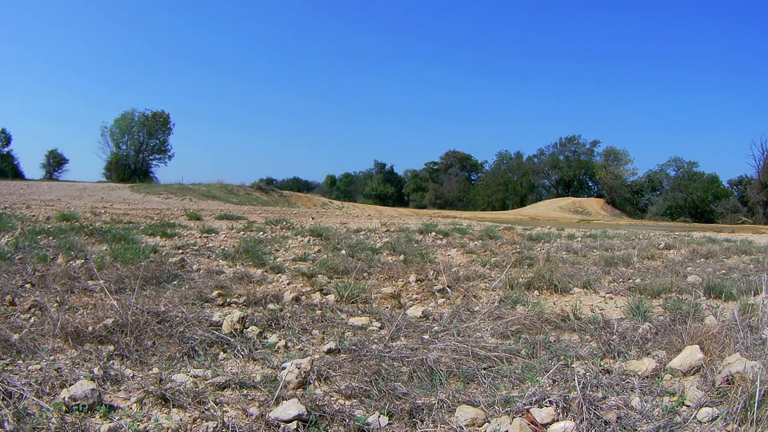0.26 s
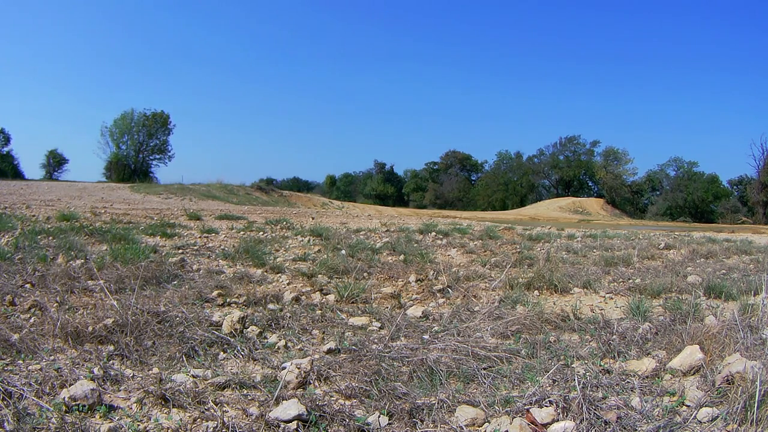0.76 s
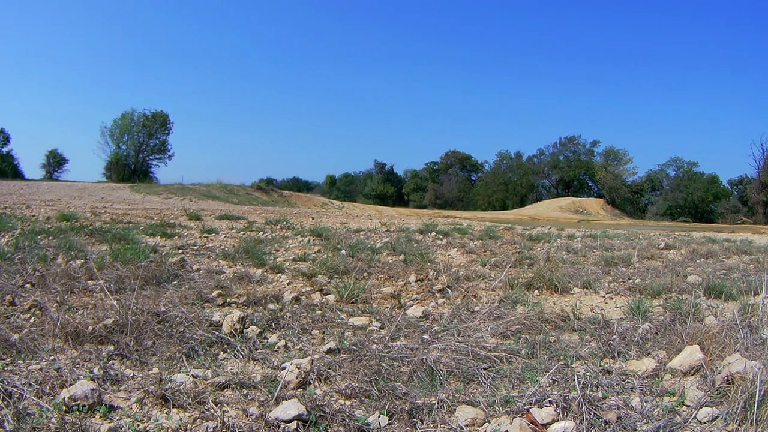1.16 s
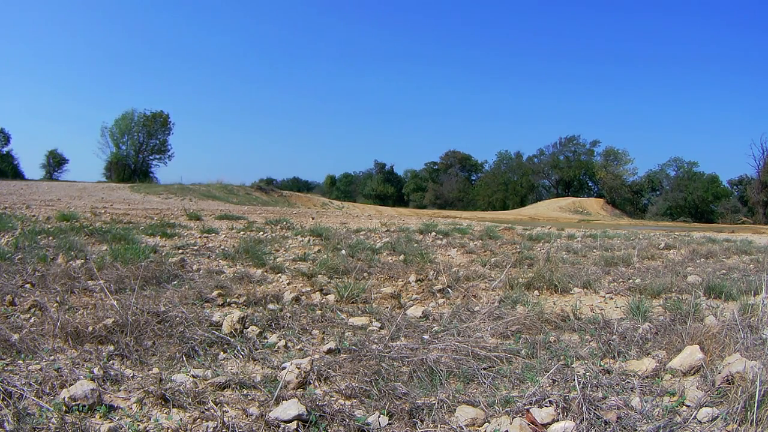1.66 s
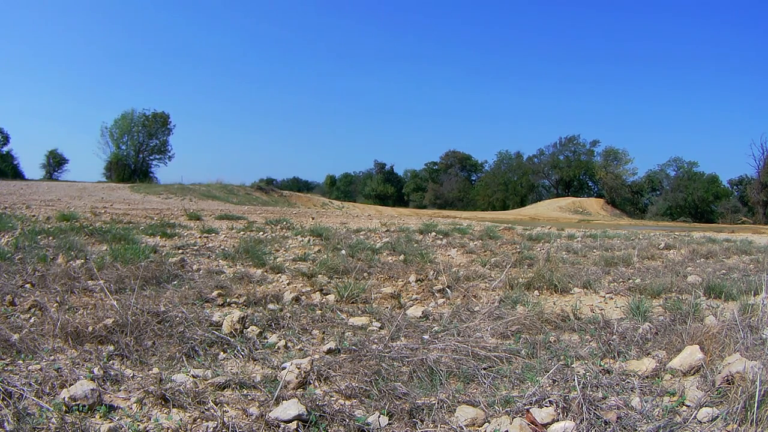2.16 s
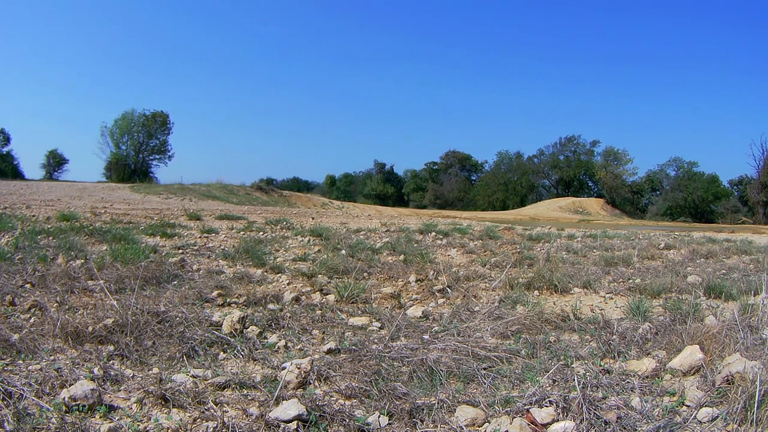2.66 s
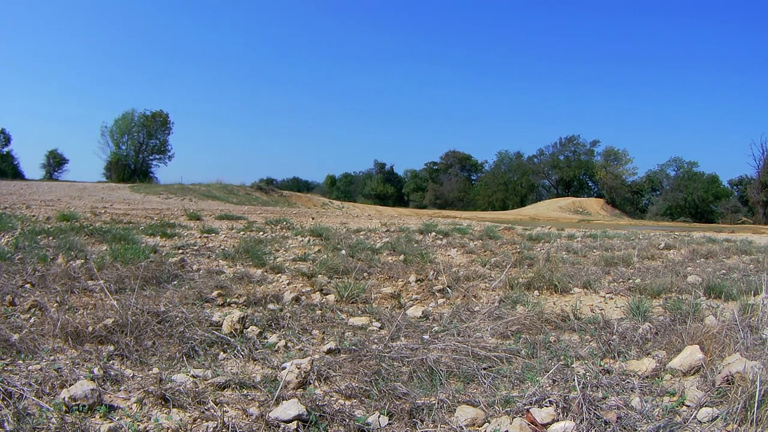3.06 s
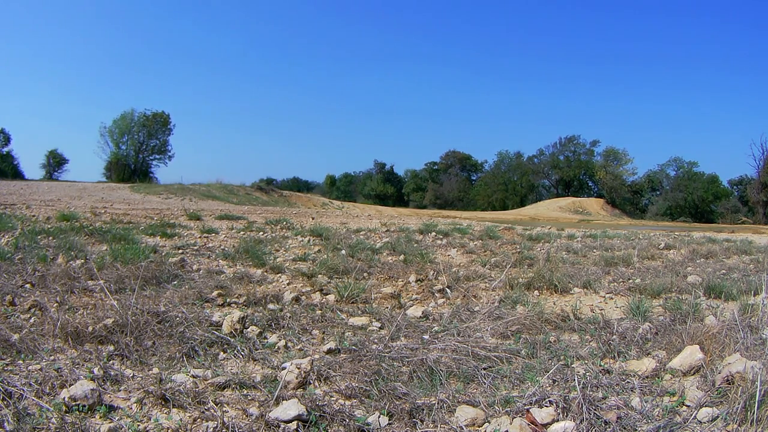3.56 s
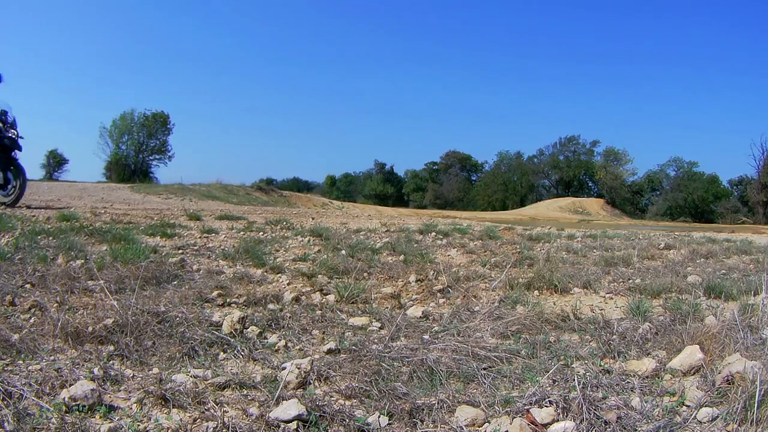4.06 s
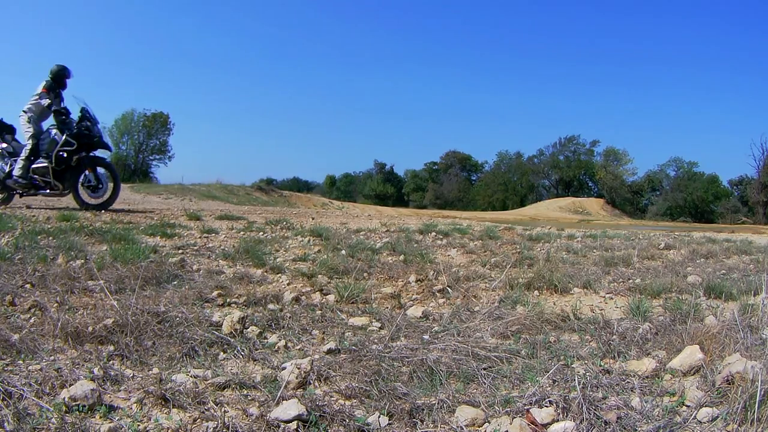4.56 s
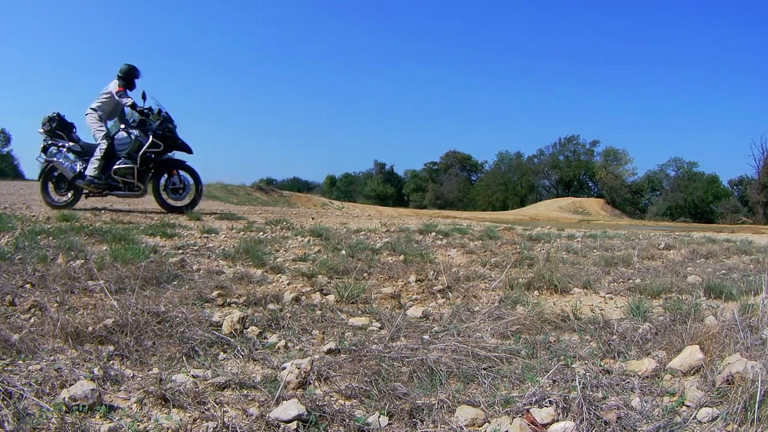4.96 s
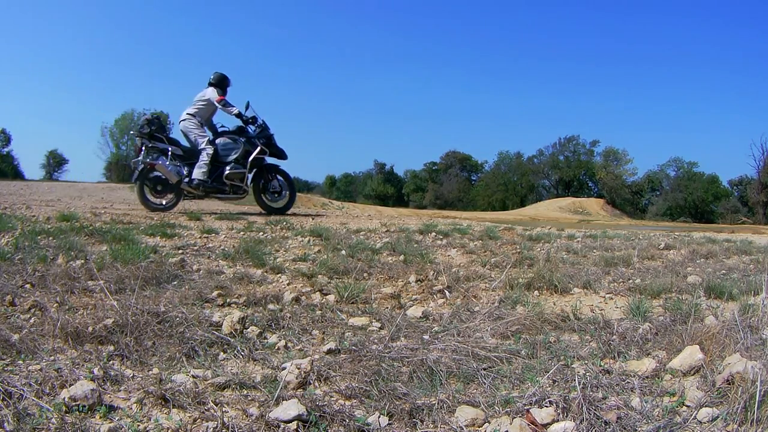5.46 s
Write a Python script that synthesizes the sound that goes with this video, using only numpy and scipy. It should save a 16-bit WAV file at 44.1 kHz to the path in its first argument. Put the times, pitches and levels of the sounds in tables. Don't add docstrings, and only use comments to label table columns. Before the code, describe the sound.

A twin-cylinder motorcycle approaches at low engine speed across an open stony field. Uneven exhaust throbs, pulsing hiss and metallic ticks start fairly distant and grow strongly until about four seconds, then stay close. Tyres crunch dry soil, and stones knock hollowly on the engine guard or ping away. Low air puffs thump the small camera microphone, mostly from three seconds on. The sound is dry, slightly thin and watery in the treble.

```python
import sys
import numpy as np
from scipy import signal
from scipy.io import wavfile
from scipy.ndimage import uniform_filter1d

SR = 44100
rng = np.random.default_rng(int(sys.argv[2]) if len(sys.argv) > 2 else 0)


def file_out(sig):
    cols = np.atleast_2d(sig).T
    lim = np.clip(cols, -1, 1)
    pcm = np.round(lim * 32767).astype(np.int16)
    wavfile.write(sys.argv[1], SR, pcm)


def field_ratio(decibels):
    return 10 ** (np.asarray(decibels, dtype=float) / 20)


N = 251370
TIME = np.arange(N) / SR
TURN_S = 4.73

# time in seconds, nearness of the machine in dB, throttle in dB.
APPROACH = [(0.0, -17.5, 0), (.3, -13, 1.5), (.55, -14.5, 1), (.87, -14, 2), (1.0, -11, 0.5),
            (1.23, -12, 1), (1.65, -11, 2), (2.05, -16.5, 5), (2.17, -14, 3.5), (2.62, -11, 3.5),
            (2.9, -9.5, 3), (3.3, -6.5, 2.5), (3.75, -1.5, 0), (3.95, -1.5, 0), (4.17, 1, 1),
            (4.75, 0.5, 4), (5.33, 1.5, 4), (5.7, 0.5, 2)]


def evened(x):
    return x / np.sqrt(np.mean(x ** 2) + 1e-20)


def column(rows, count):
    rows = np.array(rows)
    return np.interp(TIME, rows[:, 0], rows[:, count])


def bell(t, centre, width):
    return np.exp(-((t - centre) / width) ** 2)


def bumps(events):
    t = np.arange(0, N + 64, 64) / SR
    total = sum(height * np.exp(-2 * ((t - s) / length) ** 2) for s, height, length in events)
    return np.interp(TIME, t, total)


def wander(size):
    once = uniform_filter1d(rng.standard_normal(N), size=size)
    return evened(uniform_filter1d(once, size=size))


def blurred(x, bins, frames):
    return uniform_filter1d(uniform_filter1d(x, size=bins, axis=-2), size=frames, axis=-1)


def turned(t, spread_s):
    return .5 + .5 * np.tanh((t - TURN_S) / spread_s)


def zero_phase(x, order, hz, kind):
    return signal.sosfiltfilt(signal.butter(order, hz, kind, fs=SR, output="sos"), x)


def lifted(x, kind, hz, lift_db):
    return x + (field_ratio(lift_db) - 1) * zero_phase(x, 2, hz, kind)


def noise(points, size, patchy_db, flicker_db, later=((0, 0), (1, 0))):
    hz = np.fft.rfftfreq(size, 1 / SR)
    real, imaginary, patches = rng.standard_normal((4 * N // size + 5, len(hz), 3)).T
    flicker = evened(uniform_filter1d(patches[0], size=5))
    patches = evened(blurred(patches, 9, 12))
    f, db = np.transpose(points)
    shape = np.interp(np.log(hz + 1), np.log(f + 1), db, left=-90, right=-90)[:, None]
    frame_s = np.arange(real.shape[1]) * size / 4 / SR
    change_db = np.interp(hz, *np.transpose(later))[:, None]
    shape = shape + turned(frame_s, spread_s=.3) * change_db
    z = (real + 1j * imaginary) * field_ratio(shape + patchy_db * patches + flicker_db * flicker)
    return evened(signal.istft(z, nperseg=size, noverlap=3 * size // 4)[1][:N])


def ringing(modes, size):
    t = np.arange(size) / SR
    return sum(field_ratio(db - 60 * t / t60) * np.sin(2 * np.pi * hz * t) for hz, db, t60 in modes)


# time in seconds, engine cycles per second.
SPEED = [(0.0, 22.92), (0.21, 22.04), (0.33, 22.96), (0.5, 21.82), (1.16, 22.62), (1.28, 20.85),
         (1.42, 21.73), (2.79, 21.31), (2.95, 20.41), (3.06, 22.09), (3.46, 20.54), (3.88, 21.38),
         (4.15, 21.02), (4.32, 22.75), (4.77, 21.08), (4.88, 23.84), (5.34, 24.1), (5.7, 22.96)]


def crank():
    start_cycle = -.515
    return start_cycle + np.cumsum(column(SPEED, count=1)) / SR


def firings(cycles, place, spread_db, jitter_s):
    at = np.flatnonzero(np.diff(np.floor(cycles - place)) > 0)
    chance = rng.standard_normal((200, 2))[:len(at)]
    late = np.round(jitter_s * SR * chance[:, 0]).astype(int)
    train = np.zeros(N)
    train[np.clip(at + late, 0, N - 1)] = field_ratio(spread_db * chance[:, 1])
    return train


# time in seconds, level change in dB.
UNEVEN = [(.073, -5), (.474, -4), (.566, -5), (.974, 1), (1.193, -4), (1.263, 1), (1.359, -12), (1.752, -3),
          (2.073, -3.5), (2.145, -10), (2.636, 2), (2.894, -5), (3.779, -8), (4.375, -4), (4.464, 2),
          (4.602, -2.5), (4.764, -10), (5.108, -3), (5.235, -2), (5.46, 3), (5.548, -5)]


def exhaust(cycles):
    t = np.arange(2600) / SR
    turns = 95 * t + .42 * (1 - np.exp(-t / .0018))
    boom = -np.sin(2 * np.pi * turns) * (t / .0042 * np.exp(1 - t / .0042)) ** 1.05
    boom += .1 * bell(t, .017, .005) + .17 * bell(t, .022, .0022) - .14 * bell(t, .005, .0055)
    swell = .12 * bell(t, .011, .006) + .26 * bell(t, .029, .012) + .16 * bell(t, .0262, .0025)
    dip = swell - bell(t, .02, .0021)
    chamber = 0.056 * np.sin(2 * np.pi * 395 * t) * np.exp(-t / 0.02)

    near_clicks = firings(cycles, .015, spread_db=.8, jitter_s=.0002)
    far_clicks = firings(cycles, .673, spread_db=1.0, jitter_s=.0003)
    beats = signal.oaconvolve(near_clicks, boom + chamber)
    far = signal.oaconvolve(far_clicks, dip + np.roll(chamber, 800))
    beats += field_ratio(-1.4) * np.roll(far, -round(.02 * SR))
    beats = zero_phase(beats, 2, 28, "high")[:N]

    level_db = -40.5 + 0.6 * column(APPROACH, count=1) + column(APPROACH, count=2)
    uneven_db = bumps([(s, db, .018) for s, db in UNEVEN])
    return field_ratio(level_db + uneven_db) * evened(beats)


# place in the engine cycle 0-1, length in cycles, hiss in dB, crunch in dB.
VALVES = [
    (.16, 0.21, 2, 0),
    (.56, 0.2, 2, 2.5),
    (.83, 0.042, 2, 2.5),
]


def valve_gate(cycles, count):
    luck = 1 + .45 * rng.standard_normal((200, 3))
    gate_db = np.zeros(N)
    for k, row in enumerate(VALVES):
        since = cycles + 2 - row[0]
        u = since % 1 / row[1]
        gate_db += row[count] * luck[since.astype(int), k] * 4 * u * np.exp(1 - 4 * u) ** 1.15
    return evened(field_ratio(gate_db))


# time in seconds, length in seconds, rattle in dB, tappet in dB.
RUTS = [(0.287, 0.037, -0.5, 7), (0.407, 0.072, 3.5, 4.5), (0.548, 0.23, -1.5, 3),
        (1.654, 0.063, 2.5, -0.5), (1.905, 0.11, 4.5, 1), (2.027, 0.057, 6, -7), (2.275, 0.048, 2, -9),
        (2.72, 0.11, 4.5, -8), (3.0, .06, 1.5, -2), (3.417, 0.082, 2.5, 1.5), (3.857, 0.026, 1.5, 10),
        (3.939, 0.028, 3.5, 7), (4.073, 0.017, -2, -9), (4.134, 0.018, 2, 7), (4.333, 0.089, -0.5, 1.5),
        (5.036, 0.1, 1, 6), (5.234, 0.014, -1.5, -2), (5.67, 0.017, -1, 2)]


def shaking(count):
    return bumps([(row[0], row[count], row[1]) for row in RUTS])


# frequency in Hz, density in dB per Hz.
HISS = [(1500, -27), (2300, -11), (3050, -23.5), (3700, -10), (4400, -4.5), (5060, -9), (6200, -5),
        (6800, -2), (7750, 0), (8300, -11), (9000, -2), (10000, 4), (14300, -10), (15300, -4), (15800, -17)]
# frequency in Hz, change in dB.
AWAY = [(2300, -4.5), (3050, 1.5), (4400, -1), (5060, 0.5), (6800, -0.5), (7950, -6.5), (8400, 3),
        (9500, -1)]
# peak in seconds, lift in dB, length in seconds.
AIRY = [
    (.5, 0, .3),
    (1.8, 2, .2),
    (4.0, 2.5, .35),
    (5.4, 4.5, 0.18),
]


def hiss(cycles):
    level_db = -46 + column(APPROACH, count=1) + shaking(count=2)
    top_db = -2.5 - 2 * turned(TIME, spread_s=0.066) + bumps(AIRY)
    top_db = top_db + 2.5 * wander(round(0.18 * SR))
    wide = field_ratio(level_db + 0.5) * noise(HISS, size=256, patchy_db=1.5, flicker_db=0.97, later=AWAY)
    wide = lifted(wide, "low", 7900, 0.15 * (level_db + 51.0))
    return valve_gate(cycles, count=2) * lifted(wide, "high", 11200, top_db)


# frequency in Hz, level in dB, t60 in seconds.
HEAD = [(6900, 7.5, 0.0092), (7120, 2.5, 0.031), (7270, 1.5, 0.043), (7550, 1.5, 0.03), (7820, -4, 0.03),
        (9600, 0, 0.016), (9860, 2, 0.032)]
# place in two engine cycles 0-1, level in dB.
TICKS = [
    (.09, -0.5),
    (.2, -0.5),
    (.3, 1.5),
    (.43, -2),
    (.59, 0),
    (.68, -17),
    (.8, -2),
    (.925, 1),
]


def tappets(cycles):
    ticks = np.zeros(N)
    for mode in HEAD:
        train = np.zeros(N)
        for place, db in TICKS:
            train += field_ratio(db) * firings(cycles / 2, place, spread_db=5.0, jitter_s=0.0014)
        ticks += signal.oaconvolve(train, ringing([mode], size=1500))[:N]
    shade_db = -27 * turned(TIME, spread_s=0.066)
    level_db = -54.5 + 0.77 * column(APPROACH, count=1) + shade_db + shaking(count=3)
    return field_ratio(level_db) * evened(ticks)


# frequency in Hz, density in dB per Hz.
CRUNCH = [(150, -24), (260, -1.5), (330, -12.5), (400, 1.5), (480, -6), (570, -4.5), (700, -7),
          (1000, -7.5), (1400, -11), (2000, -18.5), (2700, -24.5), (3300, -37)]
# peak in seconds, crunch in dB, length in seconds.
STONY = [
    (.1, -2.5, 0.094),
    (1.48, 2.5, 0.033),
    (1.85, 0.5, .2),
    (2.3, 2.5, 0.65),
    (3.1, 3, 0.11),
    (3.55, 0, 0.082),
    (4.35, 1.5, 0.22),
    (4.85, 2, 0.096),
    (5.68, 1.5, 0.061),
]


def gravel(cycles):
    wash = valve_gate(cycles, count=3) * noise(CRUNCH, size=1024, patchy_db=0.17, flicker_db=0.88)
    strength = field_ratio(7.5 * np.minimum(rng.exponential(1, N), 3))
    strength = strength * (rng.random(N) < 260 / SR)
    stone, t, ticks = rng.integers(0, 12, N), np.arange(500) / SR, np.zeros(N)
    for k, hz in enumerate(np.geomspace(420, 1500, 12)):
        ring = np.sin(2 * np.pi * hz * t) * np.exp(-t * hz / 3.7)
        ticks += signal.oaconvolve(strength * (stone == k), ring)[:N]
    level_db = -48.5 + 0.94 * column(APPROACH, count=1) + 0.66 * shaking(count=2) + bumps(STONY)
    wash = lifted(wash, "low", 990, -.25 * (level_db + 57.0))
    return field_ratio(level_db + 1.0) * (wash + field_ratio(-10.5) * evened(ticks))


# frequency in Hz, density in dB per Hz.
BUFFET = [(5, -9), (12, 1.5), (30, -4), (60, 2), (100, -4.5), (150, -7), (200, -9.5), (280, -20),
          (400, -22), (600, -75)]
# peak in seconds, peak level in dB, length in seconds.
GUSTS = [(0.0, -60, 0.14), (0.436, -66, 0.11), (1.454, -50, 0.083), (1.666, -49.5, 0.14),
         (1.967, -54.5, 0.26), (3.39, -49, 0.11), (3.73, -42.5, 0.4), (3.992, -38, 0.18),
         (4.238, -38, 0.18), (4.71, -53, 0.41), (5.127, -46.5, .13), (5.365, -40, 0.11),
         (5.603, -41.5, 0.12)]


def buffet():
    lumps = wander(500)
    calm = field_ratio(-53 + 0.52 * column(APPROACH, count=1))
    strength = calm + bumps([(s, field_ratio(db), length) for s, db, length in GUSTS])
    air = field_ratio(3.7 * lumps) * noise(BUFFET, size=8192, patchy_db=2.0, flicker_db=-1.5)
    return strength * evened(air)


# frequency in Hz, level in dB.
WHINE = [(13701, -74.5)]


def whine():
    return sum(np.sqrt(2) * field_ratio(db) * np.sin(2 * np.pi * hz * TIME) for hz, db in WHINE)


# frequency in Hz, density in dB per Hz.
FLOOR = [(300, -1), (1500, -8.5), (3000, 1), (8000, -3.5), (15800, 1.5)]


def self_noise():
    return field_ratio(-65.5) * noise(FLOOR, size=1024, patchy_db=1.7, flicker_db=-0.7)


# start in seconds, ring peak in dB, click above the ring in dB,
# low clunk above the ring in dB.
KNOCKS = [(0.4022, -40.5, 5.5, -4.5), (.425, -57, 13, -6), (1.583, -45, 9, -10), (1.591, -45, 7, -8),
          (1.5945, -50, 8, -10), (1.6105, -56, 8, -12), (1.6146, -54, 10, -12), (1.62, -39.5, 9.5, -26),
          (1.929, -45, -15, -14), (1.959, -43, 1, -9), (2.2411, -32, -20, -5), (2.849, -43, 5, -18),
          (3.345, -40, 3, -5), (3.39, -38.5, 2, -16), (3.667, -57, 14, -10), (3.689, -52.5, 22, -6),
          (3.933, -52, -4, 16), (4.026, -46, 14.5, -17), (4.042, -45.5, 1, 14.5), (4.147, -38, -8, -13),
          (4.281, -39, 4, -16), (4.816, -50, -11, -15), (4.95, -52, 14, -2), (5.189, -57, 20.5, -2),
          (5.37, -38.5, 7, -14)]
# frequency in Hz, level in dB, t60 in seconds.
GUARD = [(320, 0, .055), (440, -6, .025), (571, -1, .055), (727, -8, .03), (860, -4, .012), (960, 1, .011),
         (1150, -7, .01), (1335, -4, .017), (1600, -13, .009)]


def knocks():
    out, t = np.zeros(N + 4000), np.arange(4000) / SR
    for s, db, click_db, clunk_db in KNOCKS:
        extra_db = [clunk_db, clunk_db, 0, 0] + 5 * [click_db]
        modes = [(hz, d + extra, t60) for (hz, d, t60), extra in zip(GUARD, extra_db)]
        rise_s = 0.00073 * field_ratio(-.3 * min(click_db, 0))
        ring = ringing(modes, size=4000) * (1 - bell(t, 0, rise_s))
        out[round(s * SR):][:len(t)] += field_ratio(db) * ring
    return signal.sosfilt(signal.butter(4, 1500, fs=SR, output="sos"), out[:N])


# centre in seconds, peak in dB, pitch in Hz.
PUFFS = [(1.069, -57, 105), (1.465, -46, 30), (1.6382, -43, 60), (1.69, -45, 128), (1.997, -55, 70),
         (2.643, -45, 50), (3.058, -58, 55), (3.329, -37, 60), (3.386, -33.5, 45.3), (3.427, -36, 153),
         (3.633, -32, 111), (3.692, -33, 65), (3.876, -27, 55), (3.939, -26, 120), (4.0305, -28, 101),
         (4.042, -23.5, 136), (4.096, -34, 87), (4.141, -25.5, 73), (4.222, -33, 88), (4.3, -30, 67),
         (4.644, -38, 93), (4.772, -43, 100), (5.017, -36, 70), (5.093, -53, 64.7), (5.221, -28.5, 70),
         (5.333, -33, 60), (5.411, -35, 85), (5.468, -35, 70)]


def puffs():
    out, t = np.zeros(N), np.arange(-2000, 2000) / SR
    for s, db, hz in PUFFS:
        push = np.cos(2 * np.pi * hz * t) * np.exp(-(1.96 * hz * t) ** 2)
        out[round(s * SR) - 2000:][:len(t)] += field_ratio(db) * push
    return out


# start in seconds, peak in dB, pitch in Hz.
PINGS = [(1.433, -46, 810), (1.484, -46, 993), (2.326, -43, 996), (2.694, -46, 525), (2.761, -46, 614),
         (2.891, -49, 560), (2.987, -44, 964), (3.124, -45, 553), (3.457, -45, 525), (3.554, -40, 725),
         (3.658, -38, 1050), (3.744, -36, 860), (3.822, -43, 568), (3.911, -53, 530), (4.12, -51, 940),
         (4.271, -33.5, 887), (4.349, -42, 580), (4.667, -37, 597), (4.849, -41, 1250), (4.895, -33, 1230),
         (4.93, -39, 1100), (4.964, -33.5, 790), (5.021, -41, 774), (5.049, -43, 746), (5.063, -39, 527),
         (5.121, -45, 970), (5.172, -41, 786), (5.199, -40, 1080), (5.23, -36, 1460), (5.314, -45, 786),
         (5.441, -45, 520), (5.597, -38, 525), (5.609, -35, 958)]


def pings():
    out, t = np.zeros(N + 2000), np.arange(2000) / SR
    rise = np.minimum(t / 0.0015, 1)
    for s, db, hz in PINGS:
        ring = np.sin(2 * np.pi * hz * t) * np.exp(-t * hz / 7)
        out[round(s * SR):][:len(t)] += field_ratio(db - 5.5) * ring * rise
    return out[:N]


def scene():
    cycles = crank()
    engine = exhaust(cycles) + hiss(cycles) + tappets(cycles)
    ground = gravel(cycles) + knocks() + pings()
    microphone = buffet() + puffs() + whine() + self_noise()
    return (engine + ground + microphone)[None]


def band_limit(x):
    return signal.sosfilt(signal.butter(12, 16520, fs=SR, output="sos"), x)


# frequency in Hz, margin to the local level in dB.
MARGIN = [(2000, -60), (2500, -7), (3000, -5), (5200, -3.6), (7000, -5.5), (8300, -6), (10500, -7),
          (12800, -4), (14000, -3), (14600, -2.2), (15100, -2.8), (15600, -4.5)]
SPARSE_S = [1.21, 1.53, 1.92, 2.72, 3.0, 3.21, 3.67, 4.14, 4.44, 4.51, 4.625, 4.82, 4.91, 5.67]


def record(dry):
    hz, t, z = signal.stft(dry, SR, nperseg=1024, noverlap=768)
    power = abs(z) ** 2
    around = blurred(power, 30, 16)
    margin_db = np.interp(hz, *np.transpose(MARGIN))[:, None]
    kept = blurred(power, 7 - 3, 7) > around * field_ratio(2 * margin_db + .2)

    sparse_time = abs(t[:, None] - SPARSE_S).min(axis=1) < .011
    treble = (hz[:, None] > 4500) & (hz[:, None] < 11500)
    strong_line = blurred(power, 3, 4) > around * field_ratio(2 * -2.2)
    kept &= ~(sparse_time & treble) | strong_line

    below_edge = (hz < 15745)[:, None]
    thinned = signal.istft(z * np.maximum(kept, .03) * below_edge, SR, nperseg=1024, noverlap=768)[1][:, :N]
    top = zero_phase(thinned, 8, 11600, "high")
    thinned = thinned - top * np.exp(-((TIME - 5.2305) / .0065) ** 6)
    return band_limit(thinned)


dry = scene()
out = record(dry)
file_out(out)
```